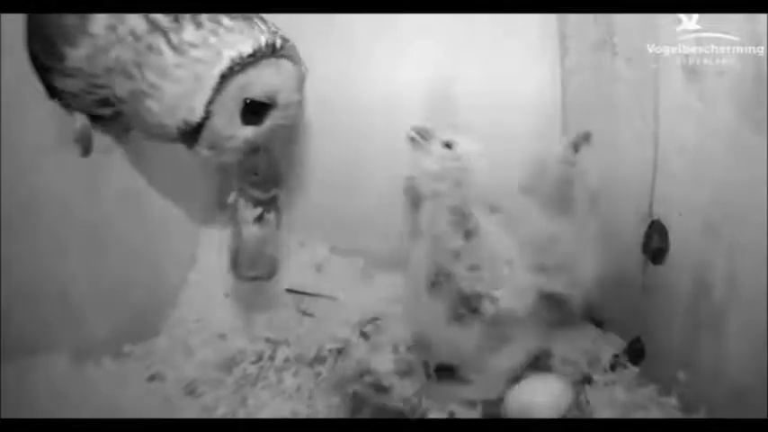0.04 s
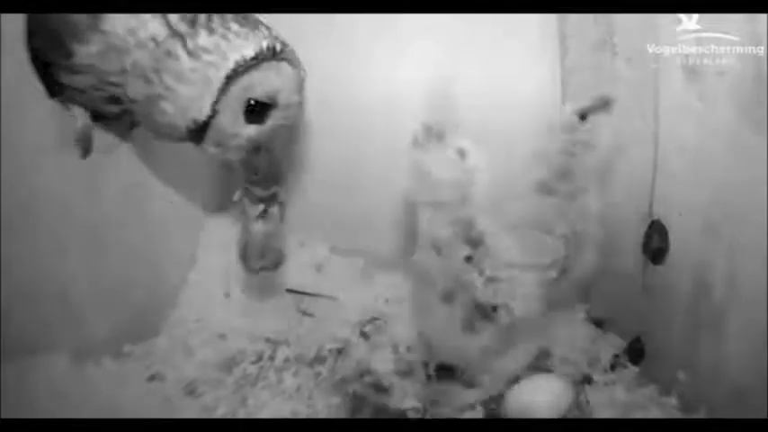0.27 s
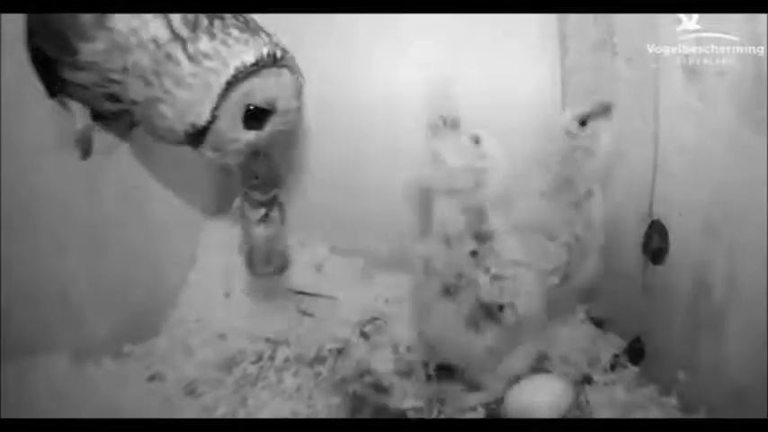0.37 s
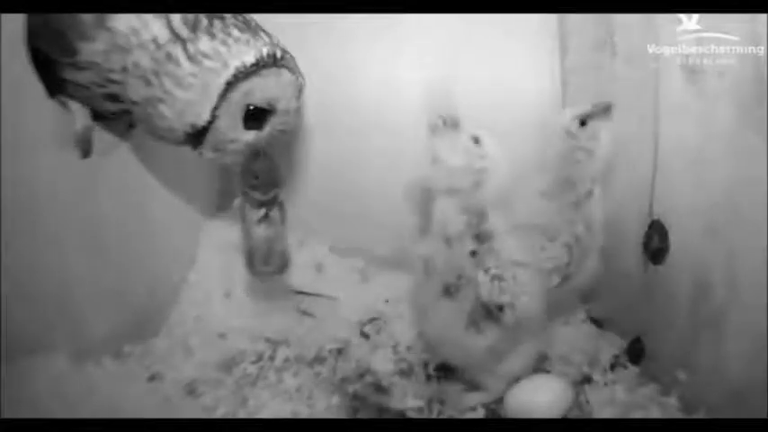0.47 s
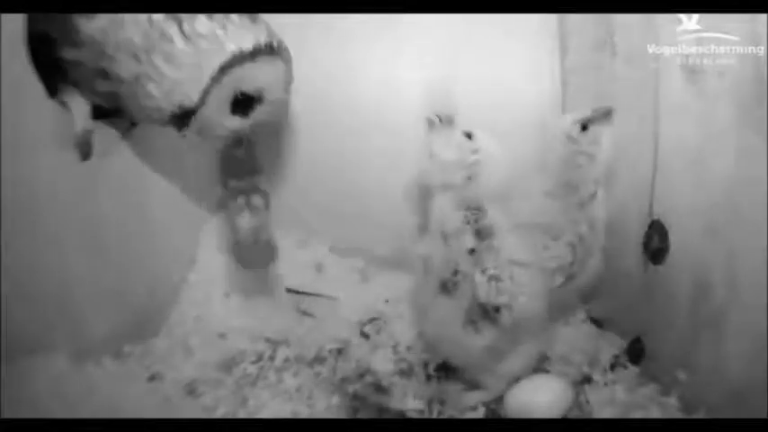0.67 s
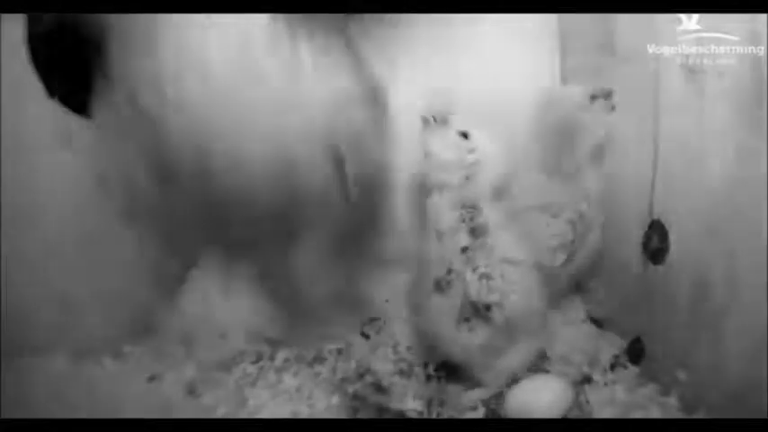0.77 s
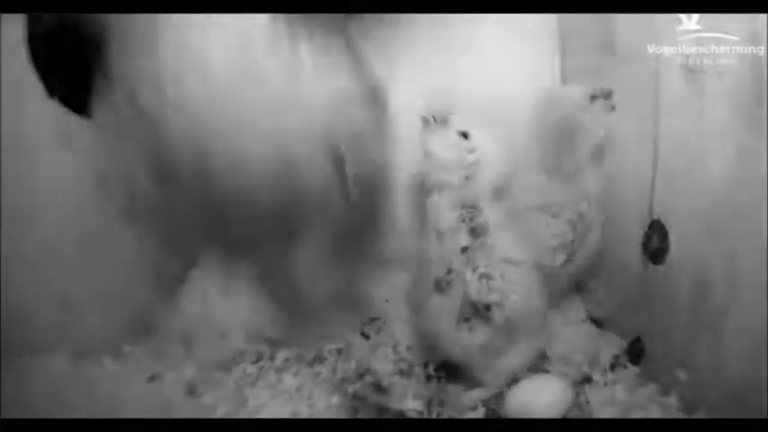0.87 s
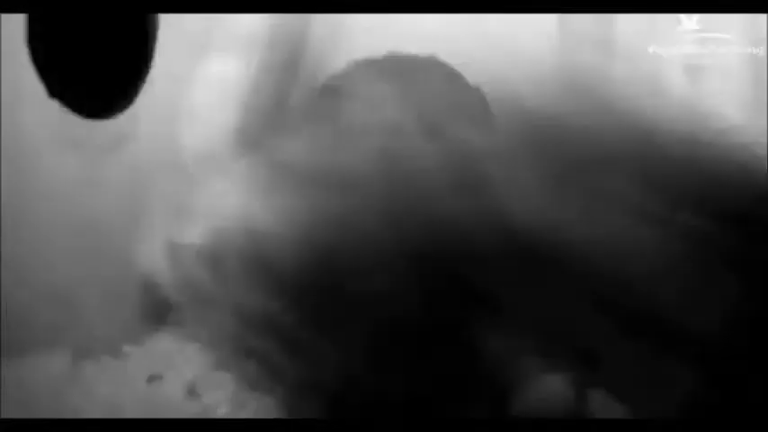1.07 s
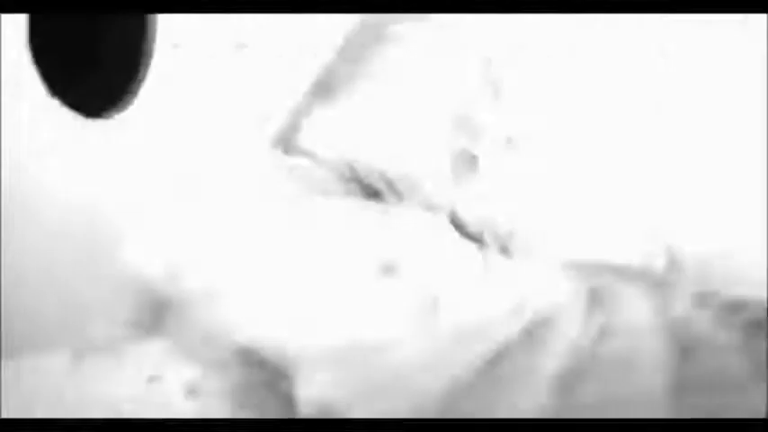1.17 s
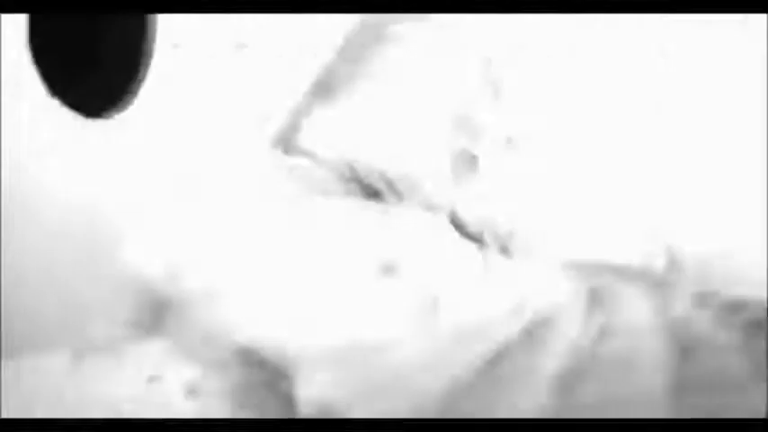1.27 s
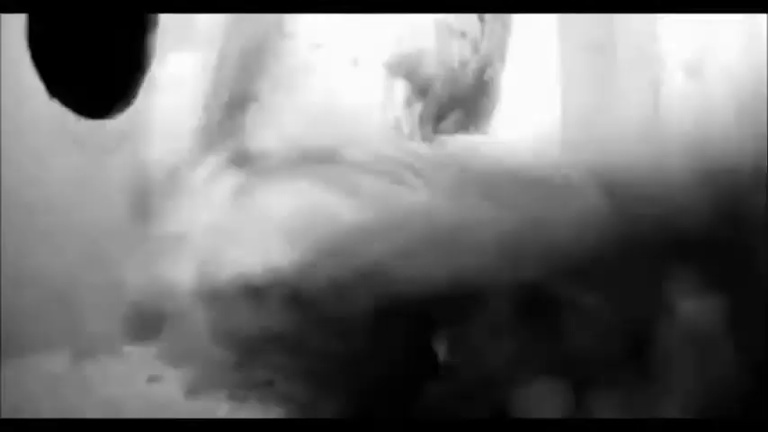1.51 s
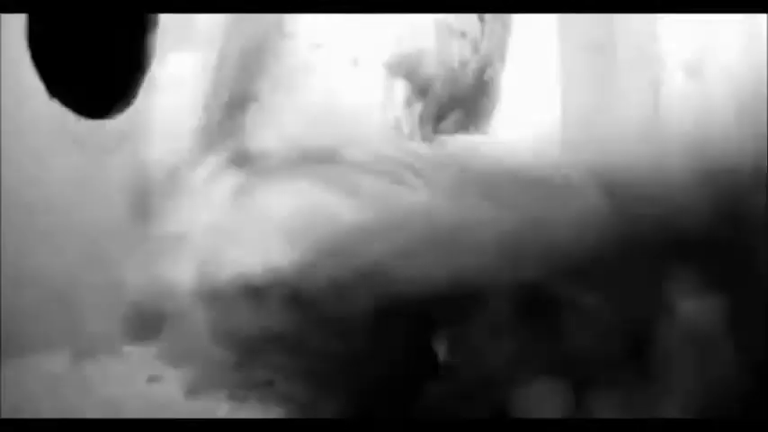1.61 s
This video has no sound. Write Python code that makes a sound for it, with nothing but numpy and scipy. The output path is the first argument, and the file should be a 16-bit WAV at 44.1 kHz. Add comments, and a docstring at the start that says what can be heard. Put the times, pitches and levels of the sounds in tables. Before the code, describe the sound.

An owl bumps loudly inside a wooden nest box, whimpering softly as chicks chirp faintly.

```python
"""Inside a wooden nest box, a small, dull microphone close to an owl, over a low mains hum.
The owl whimpers and shuffles, rustling feathers and litter. From 0.2 s it bumps and scratches the
wood right by the microphone, which overloads near 0.3 s. Soft whimpers and a few hoarse clucks follow.
From 0.9 s the chicks join in with thin, mostly paired chirps; near 1.4 s the owl stirs once more."""
import sys
import numpy as np
from scipy import signal
from scipy.fft import rfft, irfft
from scipy.io import wavfile
from scipy.ndimage import uniform_filter1d

SR = 44100
rng = np.random.default_rng(int(sys.argv[2]) if len(sys.argv) > 2 else 0)


def output_pcm(signal):
    """Save a mono or channel-first signal as 16-bit PCM at the path in sys.argv[1].

    Samples are clipped to [-1, 1] before scaling.
    """
    pcm = np.clip(np.atleast_2d(signal).T, -1, 1) * 32767
    wavfile.write(sys.argv[1], SR, np.round(pcm).astype(np.int16))


N = 72765
T = np.arange(N) / SR


def undb(db):
    """Decibels to gain."""
    return 10 ** (np.asarray(db) / 20)


def unit(x):
    """Scale to rms 1."""
    return x / np.sqrt(np.mean(x ** 2))


def noise(colour):
    """Noise of rms 1, its spectrum drawn through (frequency_hz, level_db) points."""
    hz, db = np.array(colour).T
    bins_hz = np.maximum(np.fft.rfftfreq(N, 1 / SR), 1)
    gain = undb(np.interp(np.log(bins_hz), np.log(hz), db))
    return unit(irfft(rfft(rng.standard_normal(N)) * gain, N))


def wander(rate_hz):
    """Smooth random wander of rms 1."""
    width = max(int(SR / rate_hz), 1)
    return unit(uniform_filter1d(uniform_filter1d(rng.standard_normal(N), width), width))


def swell(peak_s, attack_s, release_s):
    """A rounded rise and fall around one moment."""
    width_s = np.where(T < peak_s, attack_s, release_s)
    return np.exp(-np.minimum(((T - peak_s) / width_s) ** 2, 60))


def phase_of(hz):
    """Phase of a moving pitch."""
    return 2 * np.pi * np.cumsum(hz) / SR


def raspy(hz, rasp, flutter_hz):
    """A tone of rms 1 whose level and phase flutter."""
    phase = phase_of(hz)
    flutter = wander(flutter_hz) * np.sin(phase) + wander(flutter_hz) * np.cos(phase)
    return unit(np.sin(phase) + rasp * flutter)


# Spectrum of the quiet in the box: frequency_hz, level_db
FLOOR_COLOUR = [(25, -10.5), (45, 0.5), (130, -9.5), (800, -19.5), (2000, -28), (2800, -26.5),
                (4100, -34.5), (4800, -58.5)]
# Partials of the mains hum: pitch_hz, level_db
MAINS_HUM = [(49.7, -57), (150, -73)]


def background(floor_db=-64):
    """Faint steady noise and mains hum behind the birds."""
    floor = undb(floor_db) * noise(FLOOR_COLOUR)
    hum = sum(undb(db) * np.sin(2 * np.pi * (hz * T + rng.random())) for hz, db in MAINS_HUM)
    return floor + np.sqrt(2) * hum


def box_reflections(x, t60_s=0.071, level_db=-8.5):
    """The direct sound plus dense, quickly dying reflections from the nearby walls."""
    t = T[:N // 8]
    tail = rng.standard_normal(len(t)) * np.exp(-np.log(1000) * t / t60_s)
    return x + undb(level_db) * signal.fftconvolve(x, tail / np.linalg.norm(tail))[:N]


# Spectrum of the hiss in chirps, feathers and claws: frequency_hz, level_db
HISS_COLOUR = [(1200, -29.5), (2100, -16.5), (2550, -2.5), (3250, 1.5), (3720, -2), (3950, -11.5),
               (6000, -49)]
# The chicks calling in the nest: peak_s, pitch_hz, glide_hz_per_ms, level_db
CHICK_CHIRPS = [(.898, 2350, 20, -57), (.959, 2400, -60, -51), (.990, 2500, 55, -52),
                (1.119, 2500, 60, -56), (1.197, 2380, -50, -48), (1.230, 2480, 55, -53),
                (1.296, 2400, -55, -49.5), (1.334, 2550, 35, -52), (1.506, 2420, -35, -56),
                (1.511, 3950, -15, -64), (1.545, 2650, 70, -56), (1.595, 2420, -40, -53.5),
                (1.599, 3950, -15, -64)]


def chirps(attack_s=.0024, release_s=.0065, hiss_db=-18.5, hiss_s=.00066):
    """Tiny raspy glides that start with a hiss, mostly a falling one answered by a rising one."""
    out = 0
    hiss = undb(hiss_db) * noise(HISS_COLOUR)
    for at, hz, glide, db in CHICK_CHIRPS:
        tone = raspy(hz + glide * 1000 * (T - at), rasp=.55, flutter_hz=1100)
        onset = swell(at - attack_s, hiss_s / 2, hiss_s * 2) * hiss
        out = out + undb(db) * (swell(at, attack_s, release_s) * tone + onset)
    return out


# Clucks between the whimpers: peak_s, pitch_hz, level_db
OWL_CLUCKS = [(0.7117, 756, -41.5), (0.7648, 758, -46.5), (0.818, 807, -56), (1.189, 853, -57.5)]


def clucks(release_s=.01, sag_hz_per_s=3000):
    """Very short, hoarse, falling notes in the whimpering voice."""
    out = 0
    for at, hz, db in OWL_CLUCKS:
        tone = raspy(hz - sag_hz_per_s * (T - at), rasp=.4, flutter_hz=300)
        out = out + undb(db) * swell(at, release_s / 2, release_s) * tone
    return out


# Soft whimpers at close range, one curve of points each: time_s, pitch_hz, level_db
WHIMPER_CURVES = [
    [(0, 693, -34), (.012, 688, -38.5), (.033, 648, -40.5), (.052, 750, -43.5), (.066, 840, -68)],
    [(.33, 692, -45.5), (.356, 715, -29), (.378, 778, -39), (.415, 713.6, -31), (.445, 670, -39.5),
     (.465, 694, -55), (.483, 750, -45.5), (.505, 697, -73)],
    [(.648, 830, -55.5), (.657, 746, -48), (.666, 722, -33), (.679, 696, -34), (.69, 732, -44.5),
     (.702, 710, -66)],
    [(1.048, 737, -69.5), (1.06, 713, -49.5), (1.077, 699, -43), (1.10, 683, -56.5), (1.142, 694, -58),
     (1.148, 739, -49), (1.166, 708, -63)],
    [(1.41, 795, -66), (1.422, 741, -44.5), (1.437, 627, -40.5), (1.473, 608, -39), (1.487, 710, -49),
     (1.502, 707, -45.5), (1.53, 729, -69)],
]
# Second harmonic of each whimper, against its fundamental: level_db
SECOND_HARMONIC_DB = [-20, -37.5, -26.5, -11.5, -21.5]


def whimpers(jitter=0.012, shimmer_db=0.6, crack_at_s=1.114, crack_width_s=0.018, crack_db=3):
    """Nearly pure gliding notes with a weak overtone; one cracks an octave down."""
    out = 0
    crack = undb(crack_db) * swell(crack_at_s, crack_width_s, crack_width_s)
    for curve, second_db in zip(WHIMPER_CURVES, SECOND_HARMONIC_DB):
        at, hz, db = np.array(curve).T
        phase = phase_of(np.interp(T, at, hz) * (1 + jitter * wander(170)))
        level_db = np.interp(T, at, db) - shimmer_db * wander(220)
        sounding = (T >= at[0]) & (T <= at[-1])
        level = uniform_filter1d(undb(level_db) * sounding, size=130)  # rounds both ends over 3 ms
        tone = np.sin(phase) + undb(second_db) * np.sin(2 * phase)
        octave_down = np.sin(phase / 2) + .8 * np.sin(3 * phase / 2) + .5 * np.sin(2 * phase)
        out = out + np.sqrt(2) * level * (tone + crack * octave_down)
    return out


# Spectra of the stirred air and the brushed wall: frequency_hz, level_db
RUMBLE_COLOUR = [(20, -18.5), (45, 11.5), (130, 0.5), (300, -56.5)]
BRUSH_COLOUR = [(50, -22.5), (120, -0.5), (240, 1.5), (340, -4.5), (950, -4), (1500, -17.5), (3000, -37.5)]
# The owl shifting beside the microphone: time_s, air_db, brush_db, feather_db
OWL_MOVEMENT = [(0, -55, -41.5, -51.5), (0.069, -47.5, -51.5, -64.5), (0.149, -49, -57, -50.5),
                (0.171, -43, -46.5, -66), (0.214, -31.5, -35, -59.5), (0.238, -30, -46.5, -58.5),
                (0.28, -38.5, -39, -53), (0.306, -22.5, -20, -56), (0.334, -44, -37.5, -78),
                (.365, -41.5, -41, -72.5), (0.432, -49, -45.5, -65), (0.456, -57, -50, -54),
                (.5, -60.5, -62.5, -66), (0.622, -63, -72.5, -74), (.86, -62, -62.5, -66.5),
                (0.927, -55, -51.5, -63), (0.964, -69.5, -81.5, -75), (1.39, -61, -71, -74.5),
                (1.43, -44, -53, -70), (1.529, -67.5, -79.5, -83.5)]


def rustle(patchy_db=2, grit_db=3):
    """The moving body stirs the air and brushes the wall; feathers hiss unevenly."""
    at, *curves_db = np.array(OWL_MOVEMENT).T
    air_level, brush_level, feather_level = (undb(np.interp(T, at, db)) for db in curves_db)
    air = noise(RUMBLE_COLOUR)
    brush = unit(noise(BRUSH_COLOUR) * undb(patchy_db * wander(170)))
    feathers = unit(noise(HISS_COLOUR) * undb(grit_db * wander(190)))
    return air_level * air + brush_level * brush + feather_level * feathers


# Claws catching on the wood near the microphone, and the bright cracks of the nearby knocks: peak_s, level_db,
# half_width_ms
CATCHES_AND_CRACKS = [(0.173, -37.5, 6.8), (0.1948, -40.5, 2.7), (0.287, -35, 1.3), (0.299, -29.5, 3),
                      (0.306, -16.5, 2.4), (0.312, -26.5, 2.5), (0.3238, -30.5, 0.5), (0.348, -36.5, 1.7),
                      (0.392, -47, 1.5), (0.937, -51, 1), (1.446, -52, 2.5)]
# Claws sliding on the wood: peak_s, pitch_hz, level_db
CLAW_SLIDES = [(.129, 3060, -51), (.153, 3680, -54), (.268, 3430, -52)]


def scratches(slide_s=.015, rise_hz_per_s=8000):
    """Claws catch on the wood and knocks crack in short gritty bursts, or claws slide with a hoarse rising
    squeak."""
    bursts = sum(undb(db) * swell(at, ms / 1000, ms / 1000) for at, db, ms in CATCHES_AND_CRACKS)
    slides = 0
    for at, hz, db in CLAW_SLIDES:
        squeak = raspy(hz + rise_hz_per_s * (T - at), rasp=1, flutter_hz=600)
        slides = slides + undb(db) * swell(at, slide_s, slide_s) * squeak
    return bursts * noise(HISS_COLOUR) + slides


def sway(peak_s=1.322, width_s=0.024, pitch_hz=76.5, level_db=-47.5):
    """One faint, low throb of a few cycles."""
    tone = np.sqrt(2) * np.sin(2 * np.pi * pitch_hz * (T - peak_s))
    return undb(level_db) * swell(peak_s, width_s, width_s) * tone


# Modes of the box's boards: pitch_hz, relative_db, t60_s
BOARD_MODES = [(119.3, -2.5, 0.027), (257, -7.5, 0.062), (416, -12, 0.061), (611, -19.5, 0.12),
               (914, -22, 0.092), (1010, -20, 0.091)]
# The owl bumping the wall, close to the microphone: start_s, level_db, contact_ms
WALL_KNOCKS = [(0.2018, -23.5, 1.06), (0.2039, -16.5, 3), (0.2238, -21.5, 2.9), (0.2826, -16, 1.3),
               (0.2953, -9.5, 3.2), (0.3026, -2, 1.9), (0.3081, 1, 1.1), (0.3105, -6.5, 5.43),
               (0.3237, 1.5, 0.868), (0.924, -39.5, 4.2)]


def knocks(rebound_half_cycles=1.43, ring_db=-10.5):
    """Each knock shoves the wall, which gives and rebounds, and briefly rings the boards."""
    push = 0
    for at, db, contact_ms in WALL_KNOCKS:
        half_cycles = np.clip((T - at) / (contact_ms / 1000), 0, 20)
        fade = np.exp(-(half_cycles / rebound_half_cycles) ** 4)
        push = push + undb(db) * np.sin(np.pi * half_cycles) * fade
    t = T[:N // 4]
    ring = sum(undb(db) * hz / SR * np.sin(2 * np.pi * hz * t) * np.exp(-np.log(1000) * t / t60_s)
               for hz, db, t60_s in BOARD_MODES)
    return push + undb(ring_db) * signal.fftconvolve(push, ring)[:N]


def scene():
    """Everything that reaches the microphone inside the box, in one channel."""
    owl = knocks() + sway() + rustle() + whimpers() + clucks()
    claws_and_chicks = box_reflections(scratches() + chirps())
    return (owl + claws_and_chicks + background())[None]


def treble_spray(x, level_db=-49, decay_s=.0045, band_hz=(6500, 9000)):
    """A faint, fine hiss that follows the loudest knocks and dies away."""
    pole = np.exp(-1 / (decay_s * SR))
    envelope = np.sqrt(signal.lfilter([1 - pole], [1, -pole], x ** 8))
    spray = signal.lfilter(*signal.butter(2, band_hz, "band", fs=SR), rng.standard_normal(N))
    return undb(level_db) * envelope * spray


def record(dry, dip_hz=1975, dip_width_hz=200, mic_top_hz=4060, ceiling=.455, knee=9, top_hz=15700):
    """A small, dull microphone with a dip in the mids; its amplifier flattens peaks and hisses."""
    x = signal.lfilter(*signal.iirnotch(dip_hz, dip_hz / dip_width_hz, fs=SR), dry)
    x = signal.sosfilt(signal.butter(12, mic_top_hz, fs=SR, output="sos"), x)
    x = x / (4.0 + np.abs(x / ceiling) ** knee) ** (1 / knee)  # soft clipping
    x = x + undb(-96) * rng.standard_normal(N)  # amplifier hiss
    x = x + treble_spray(x / ceiling)
    return signal.sosfilt(signal.ellip(8, .2, 70, top_hz, fs=SR, output="sos"), x)


dry = scene()
out = record(dry)
output_pcm(out)
```